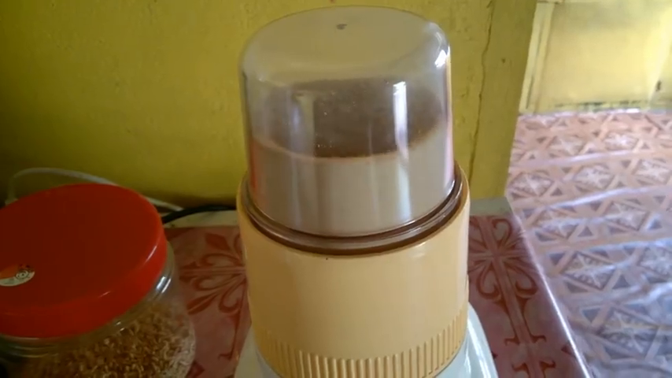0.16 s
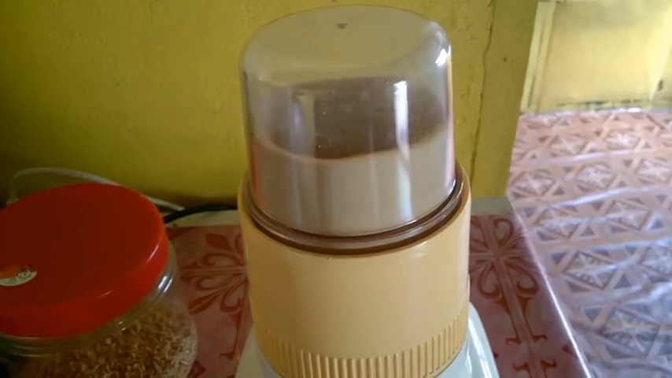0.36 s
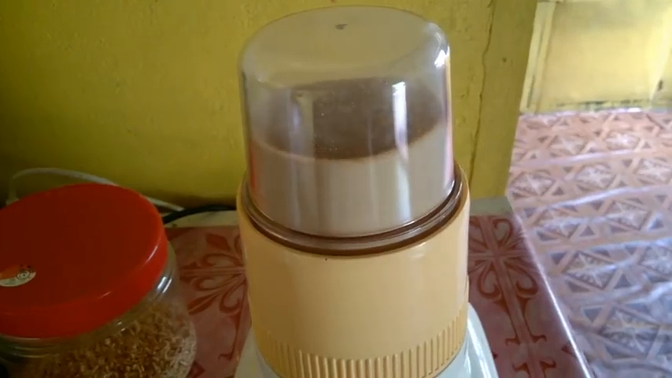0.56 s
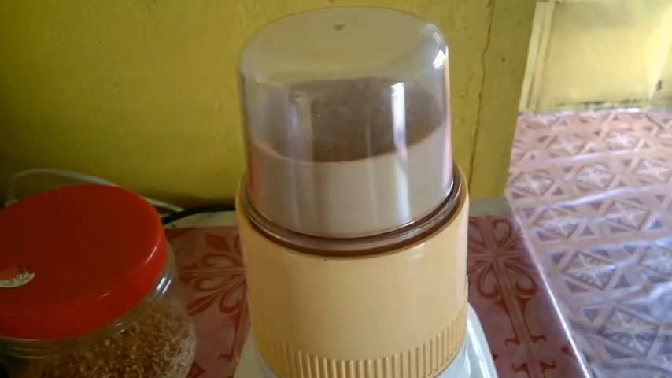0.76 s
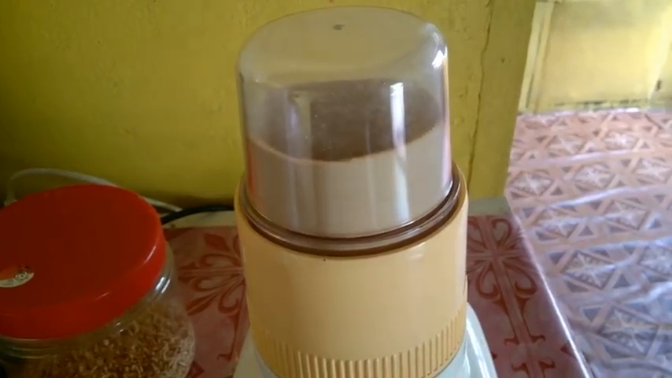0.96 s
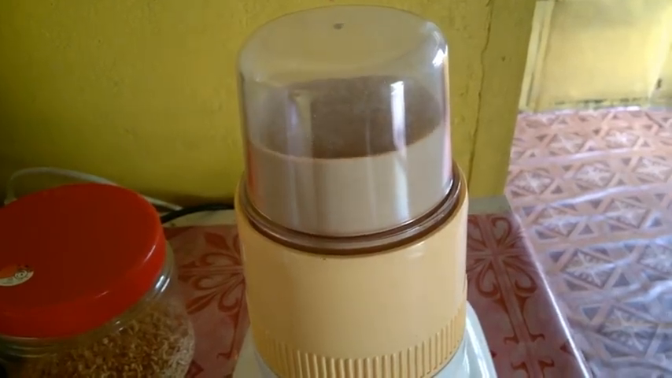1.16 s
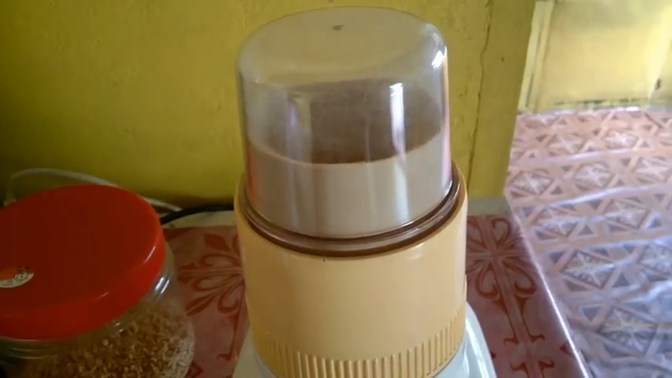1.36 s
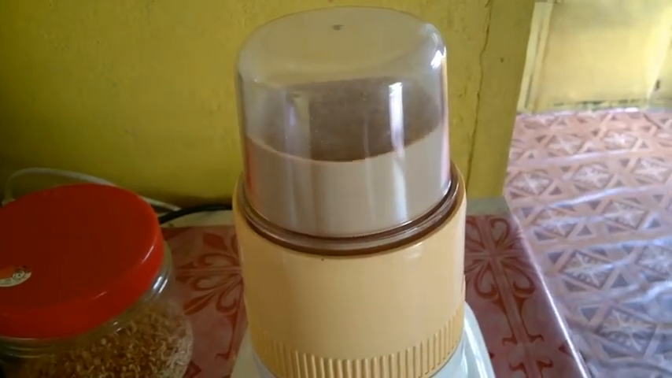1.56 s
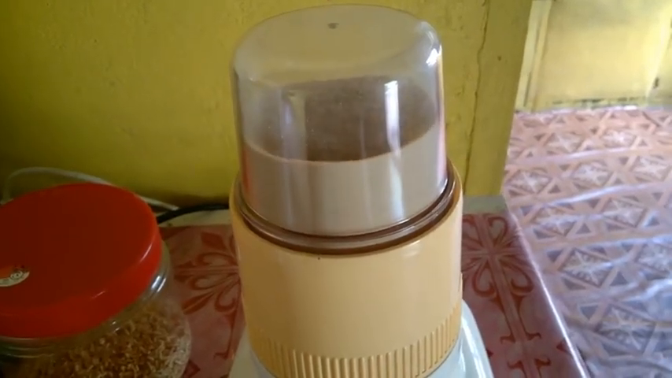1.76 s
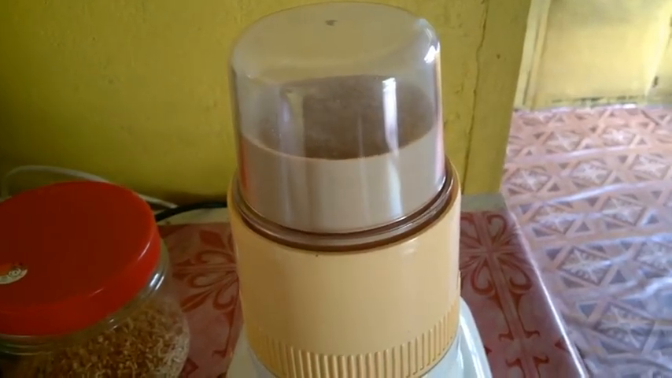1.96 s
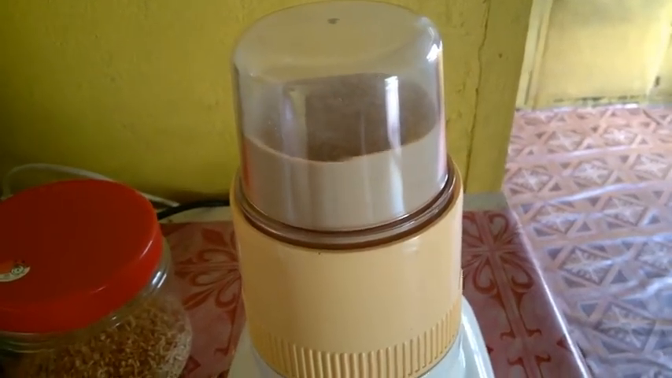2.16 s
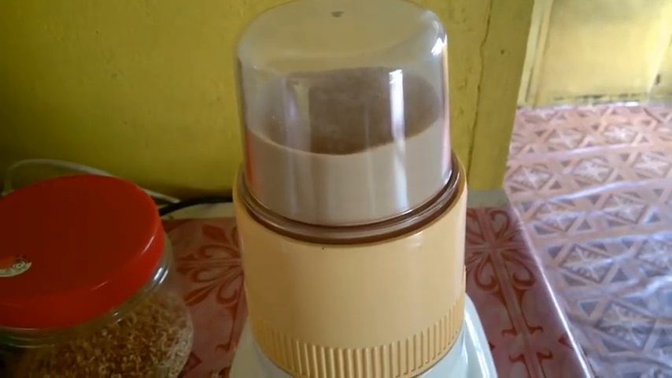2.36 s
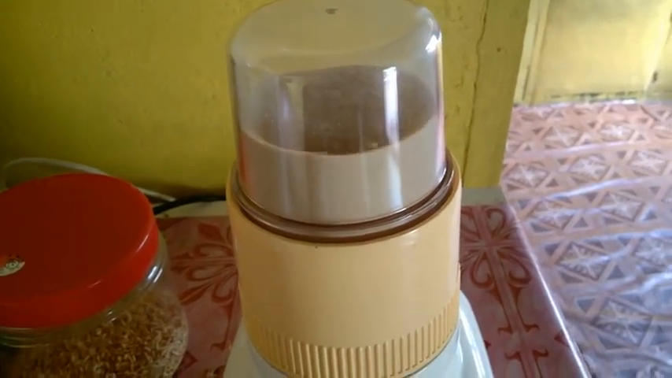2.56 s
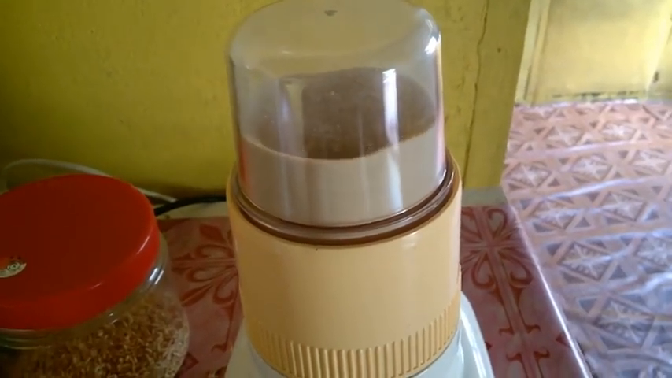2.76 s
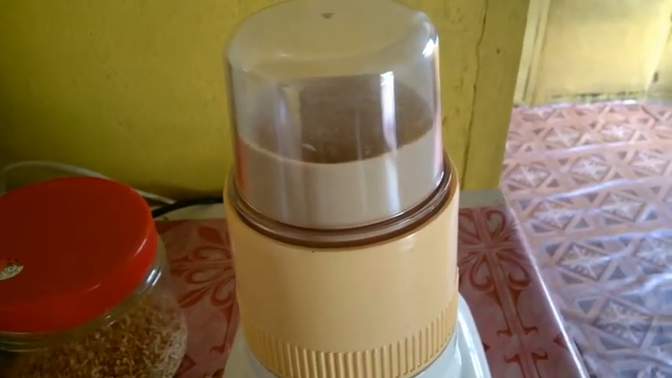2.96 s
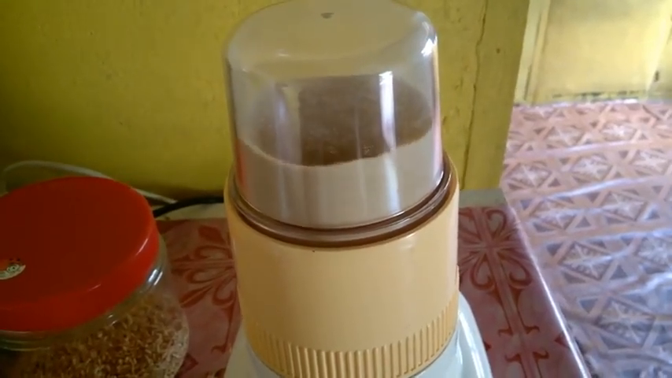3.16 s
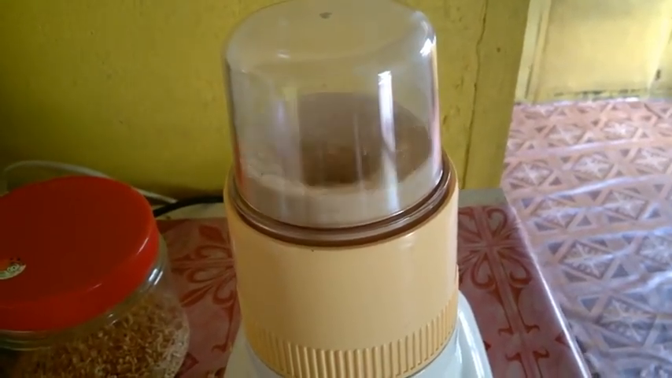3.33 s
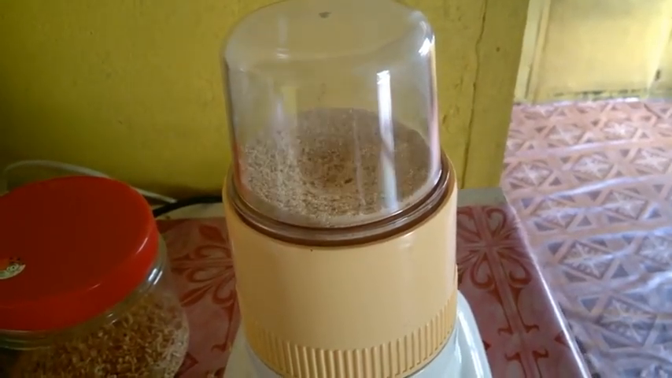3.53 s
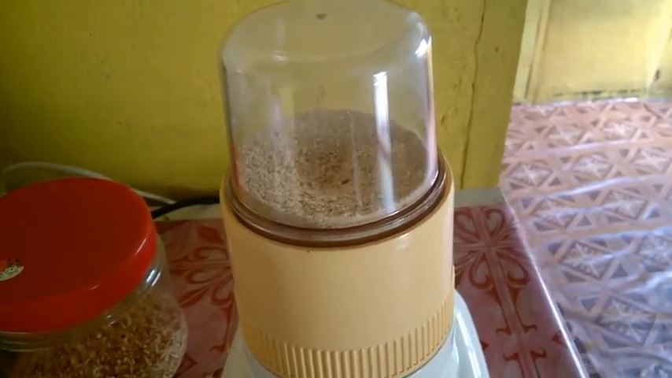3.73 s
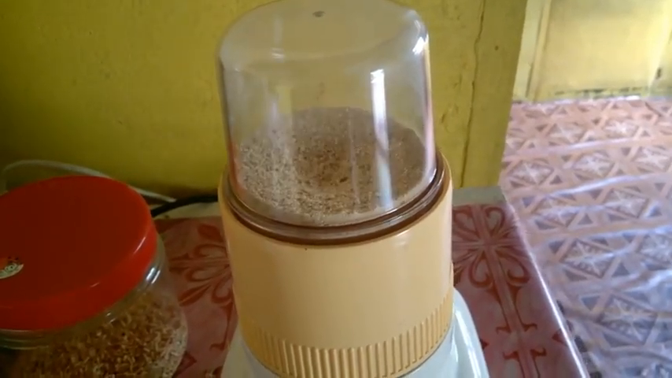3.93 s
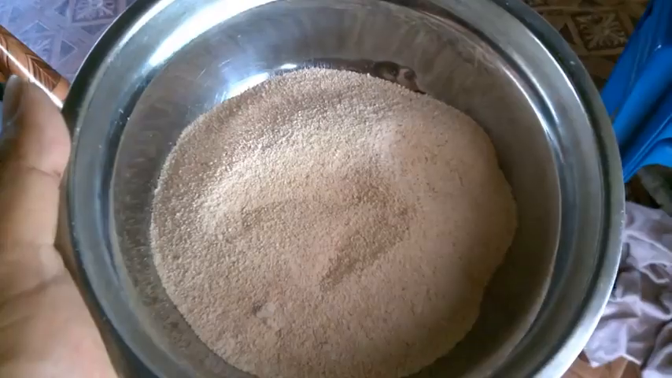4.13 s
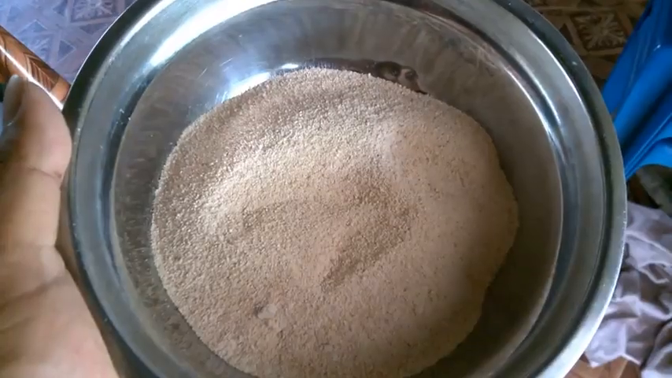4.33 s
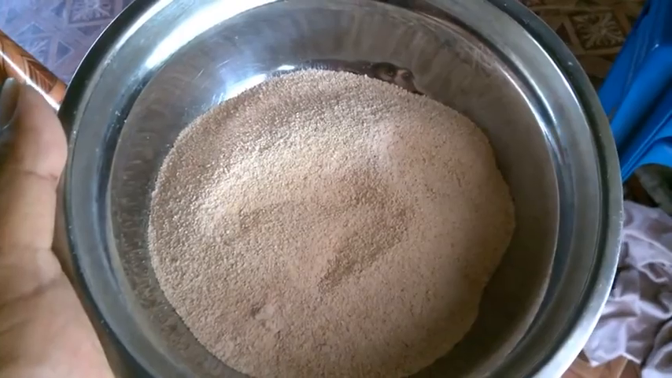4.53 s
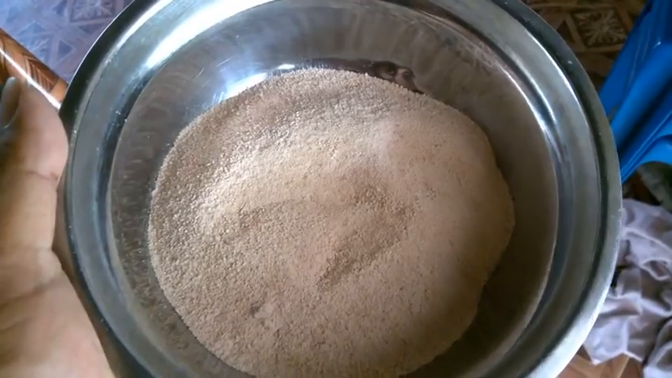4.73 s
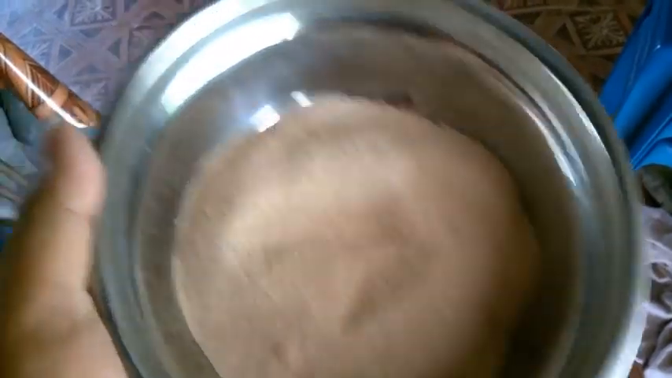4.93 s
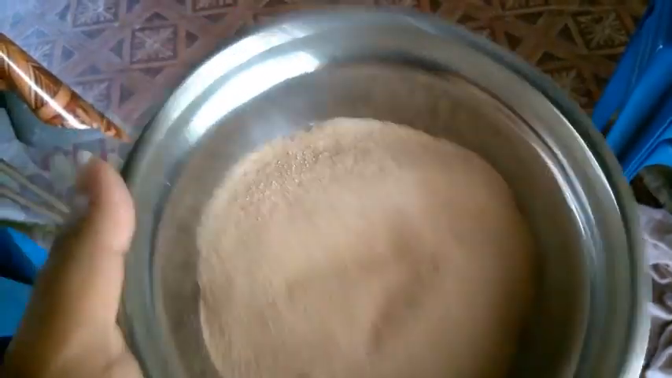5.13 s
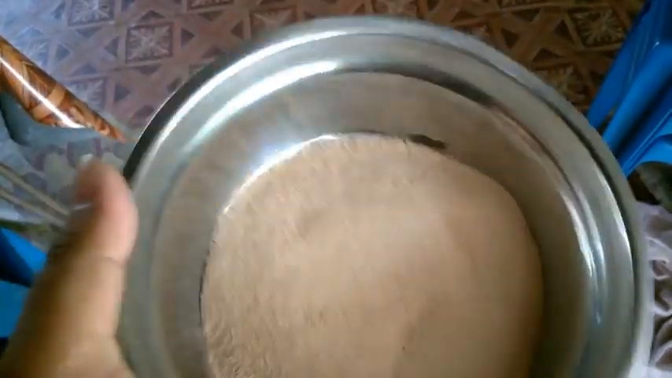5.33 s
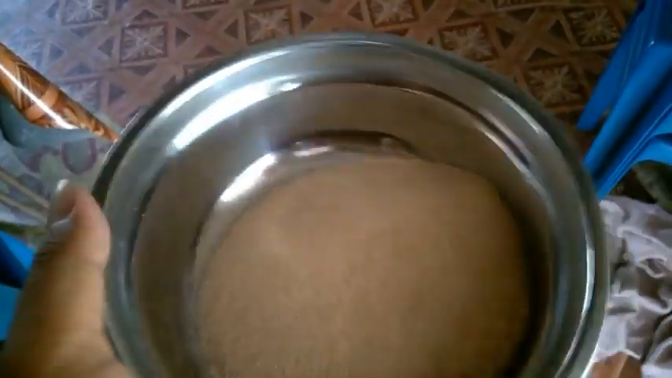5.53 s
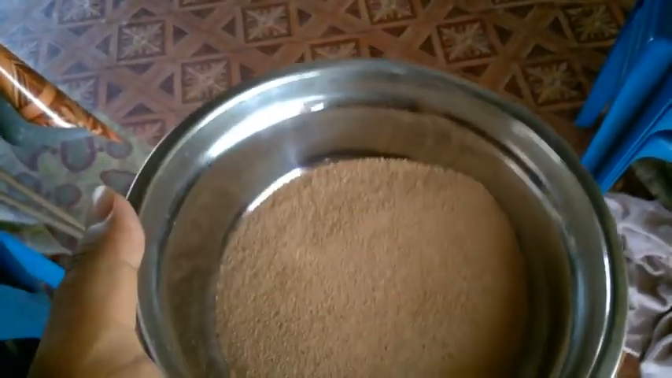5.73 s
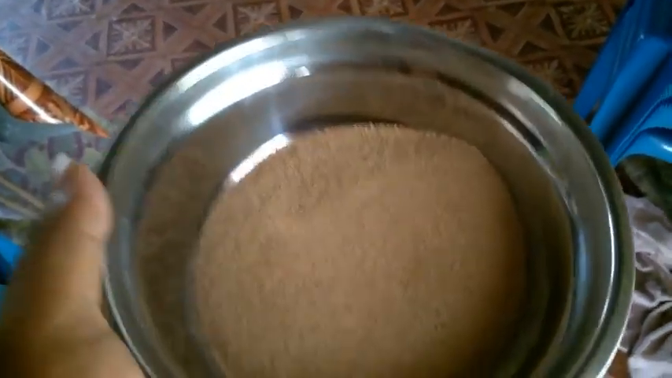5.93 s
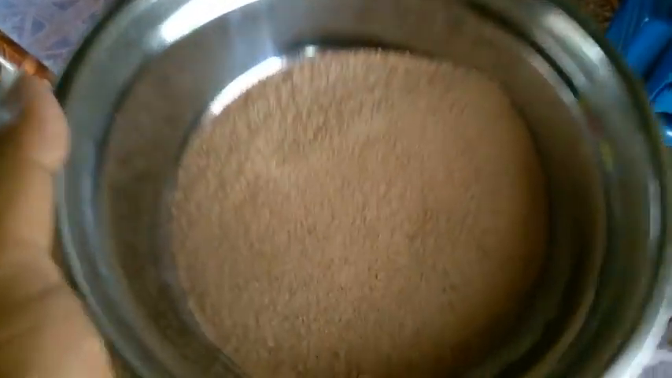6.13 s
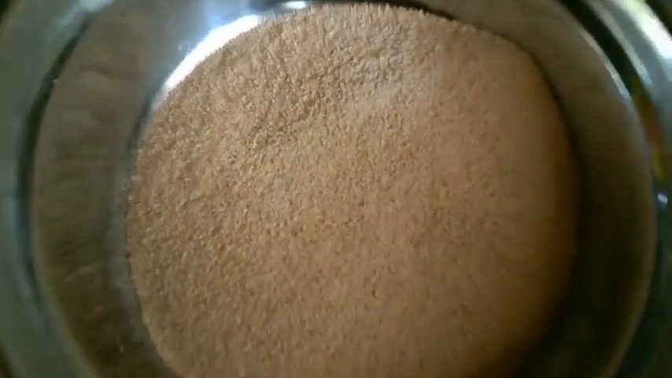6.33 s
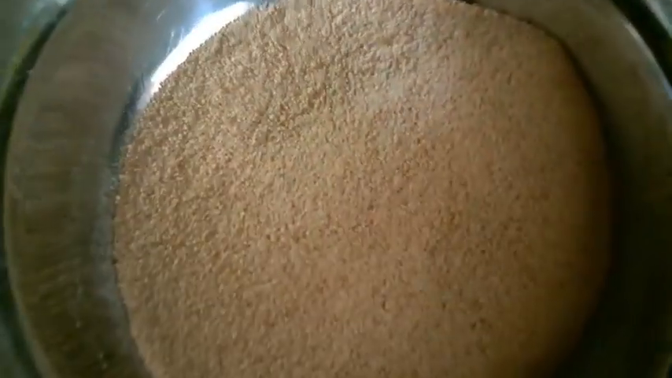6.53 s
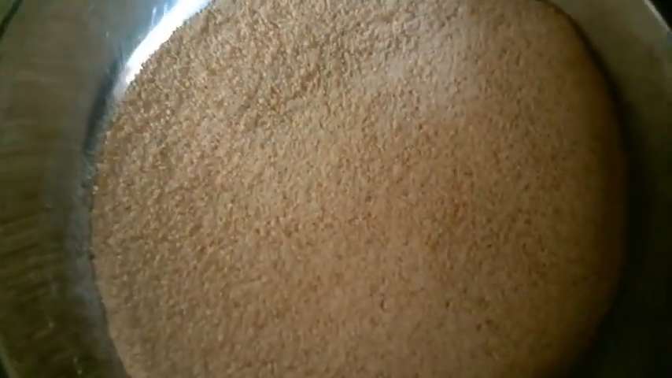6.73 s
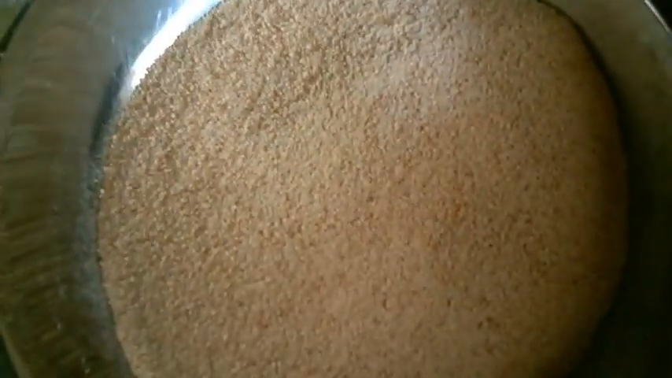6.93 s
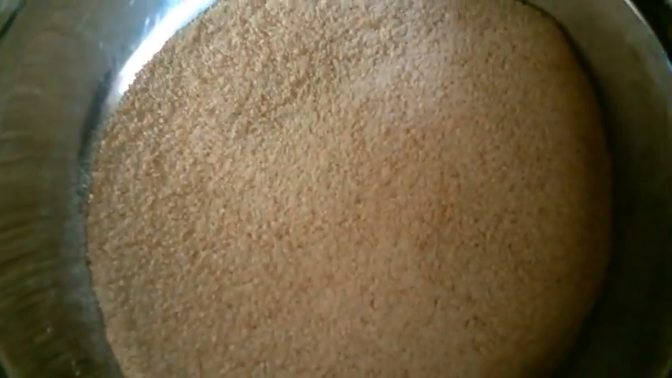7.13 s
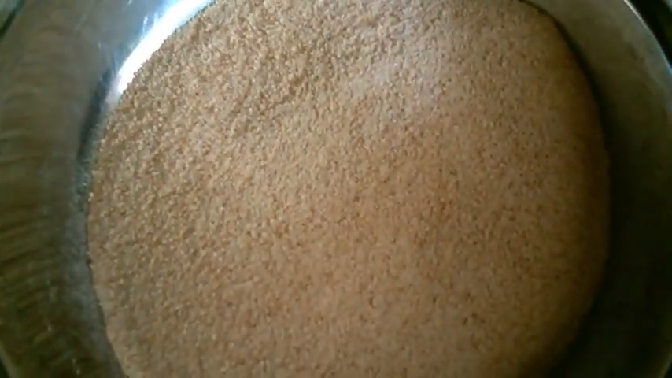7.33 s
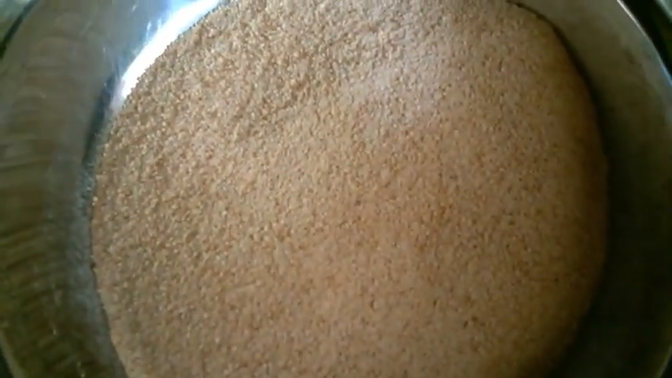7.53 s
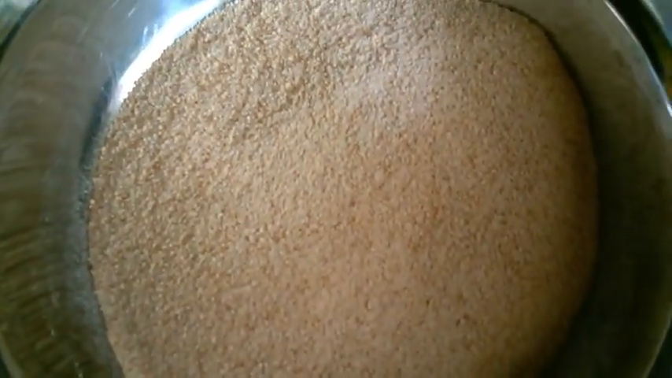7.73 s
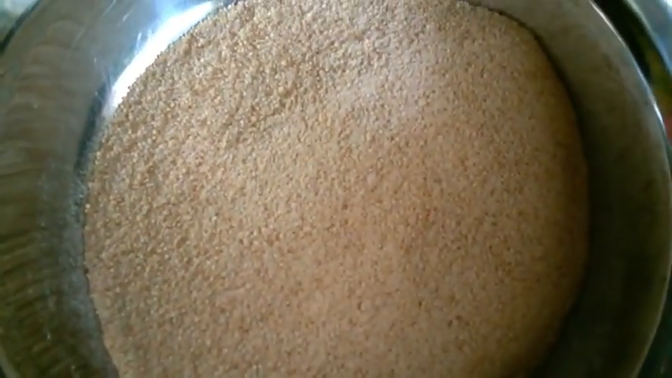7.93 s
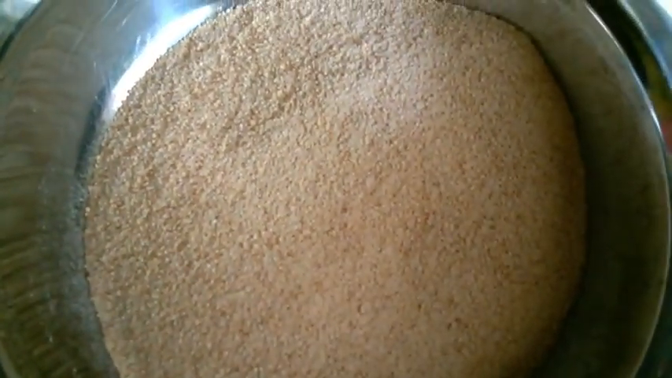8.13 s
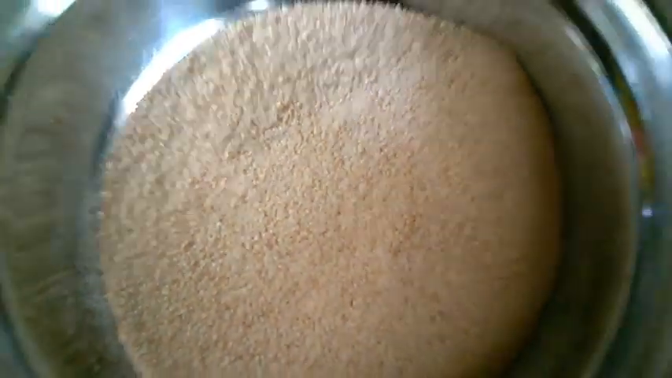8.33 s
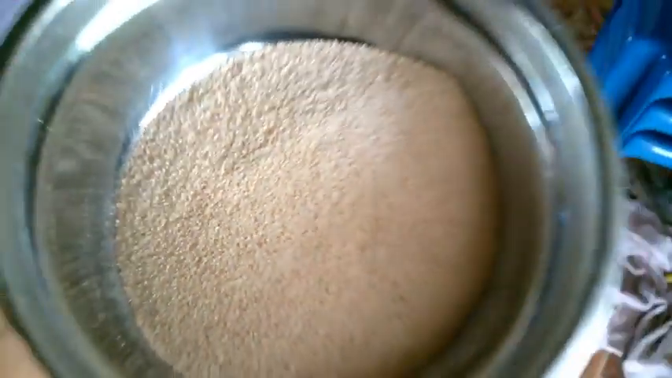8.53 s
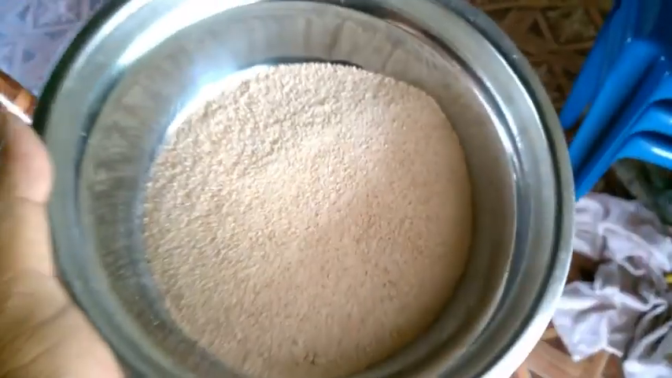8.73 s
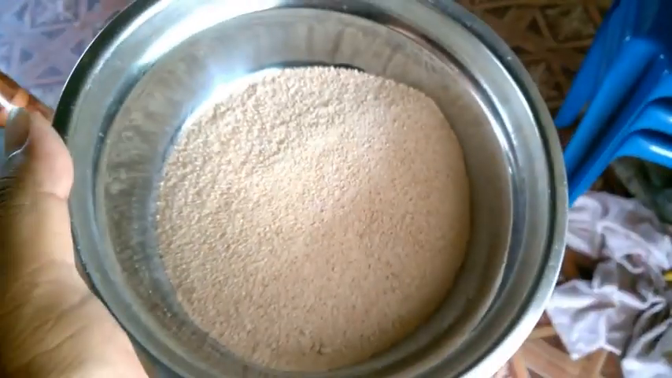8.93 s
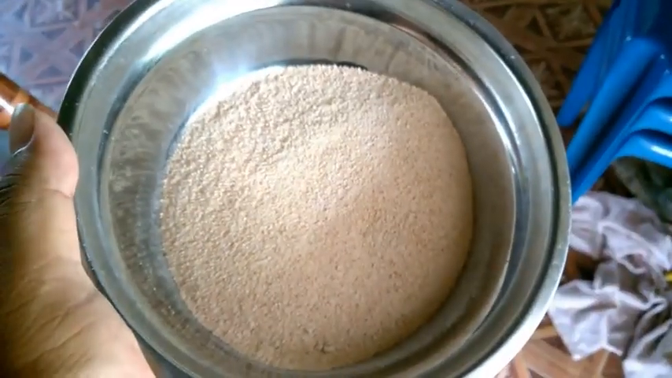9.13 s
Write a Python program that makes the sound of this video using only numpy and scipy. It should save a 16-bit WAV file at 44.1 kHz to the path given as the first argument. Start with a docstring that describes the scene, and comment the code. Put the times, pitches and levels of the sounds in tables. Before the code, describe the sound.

From 0 to 2.4 seconds a small electric grinder runs loudly and close: a steady buzzing motor hum near 245 hertz, rough knocking and a dense bright hiss of grains against a plastic jar, the knocks softening slightly as the hiss grows. At 2.4 it is switched off; pitch slides down smoothly for about a second, grain noise thinning, with a tiny burst at 3.0, stopping near 3.4. A faint shrill cicada and light handling rustles remain. Near silence from 4.15 to 4.26, then a quick fade-in to quiet room air, low wavering drone and a second, nearer cicada. Small gliding, echoing bird chirps come from 4.5 to 5.8, and again from 7.1 to 8.9. Soft, quickening powder swishes occur around 5.1 to 5.6. A dull thud with clatter lands at 6.65, weaker bumps until 7.1. Hum shifts around 7.6; sparse rustles continue, and a faint knock comes at 9.

```python
"""A small electric grinder hums, knocks and hisses first: rotor harmonics excite its housing, and grains
strike a plastic jar. Switched off, it spins down in a kitchen. A shrill whine, probably of cicadas, is a comb
of click-rate harmonics; tones and coloured noise make a low appliance hum and the room air. Soft rustles are
band noise. After a short, nearly silent break come gliding bird chirps, noise swishes of powder in a steel
bowl, a second, nearer cicada and bumps in the house, made of decaying noise."""
import sys
import numpy as np
from scipy import signal
from scipy.fft import rfft, irfft, next_fast_len
from scipy.io import wavfile
from scipy.ndimage import uniform_filter1d, map_coordinates

SR = 44100
rng = np.random.default_rng(int(sys.argv[2]) if len(sys.argv) > 2 else 0)


def to_wav(sig):
    """Store sig (one row per channel, or 1-D mono) as 16-bit WAV at the path in sys.argv[1].

    Samples outside -1..1 are clipped; the rate is SR.
    """
    pcm = np.clip(np.atleast_2d(sig), -1, 1) * 32767
    pcm = np.round(pcm).astype(np.int16)
    wavfile.write(sys.argv[1], SR, pcm.T)  # frames by channels


N = 404705

# All source levels are in dB ahead of the recorder's input gain; spectra give relative dB.
# Harmonics of the rotor's shaking. Each row: multiple of the rotor speed, level in dB at 0 dB housing gain.
ROTOR_HARMONICS = [(1, -21.8), (2, -30.8), (3, -36.5), (4, -44), (5, -45)]
# Mains ripple side tones, 100 Hz above a rotor harmonic. Each row: multiple of the rotor speed, level in dB.
MAINS_SIDE_TONES = [(1, -48), (3, -37)]
# How well the housing radiates. Each row: frequency in Hz, gain in dB.
HOUSING_RADIATION = [(30, -14), (55, -2), (100, -11), (145, -3), (185, -9), (215, -7), (240, 1.5),
                     (255, -4), (290, -5), (345, 1), (400, -4), (450, 4.5), (490, 2), (560, -16),
                     (750, -20), (1200, -5)]
# Broad colour of grains hitting the jar. Each row: frequency in Hz, gain in dB.
JAR_SLOPE = [(40.0, -28.5), (100.0, -19.5), (200.0, -15), (330.0, -8), (700.0, -16), (1000.0, -14),
             (1700.0, -12), (2700.0, -5), (4400.0, -3.5), (5400.0, 1), (6500.0, -11.5), (9500.0, -19),
             (13500.0, -26.5), (15500.0, -33.5)]
# Resonances and hollows of cup and lid. Each row: centre in Hz, half width in Hz, gain in dB.
JAR_RESONANCES = [(145, 14, 3.5), (469, 41, 7.5), (557.6, 16, -14), (642, 36, 4), (836, 23, 6.5),
                  (1181, 190, 11), (1490, 93, 5.5), (2040, 56, 8), (2964, 100, 3), (3600, 100, -9.5),
                  (3925, 70, 12), (4115, 33, 2), (4100, 39, -4), (4700, 64, 7.5), (5270, 24, 2),
                  (5390, 61, 1.5), (5780, 34, 4.5), (7137, 260, 9), (7530, 50, 7.5), (7920, 30, -8),
                  (8030, 150, 8.5), (8892, 270, 5.5), (11050, 640, 6.5), (15020, 550, 7.5)]
# Comb of lines in the cicada song. Each row: multiple of the click rate, relative level in dB.
TYMBAL_LINES = [(16, -39), (17, -26.5), (18, -7), (19, -6.5), (20, 0), (21, -7.5), (22, -12), (23, -22),
                (24, -22), (25, -34.5), (26, -31), (27, -38), (28, -38.5), (34, -44.5)]
# Noisy part of the cicada song. Each row: frequency in Hz, relative level in dB.
RASP_SPECTRUM = [(4500, -52), (5400, -27), (5900, 8), (6700, -5), (7200, -14), (8300, -30), (10700, -39.5),
                 (12000, -55.5)]
# The near cicada, heard only after the break. Each row: time in seconds, level in dB.
NEAR_CICADA_LEVEL = [(4.45, -38.5), (5.72, -36.5), (6.42, -40), (6.47, -37), (7.03, -35), (7.16, -41.5),
                     (7.84, -34), (8.0, -41), (8.12, -35.5), (8.31, -37.5), (8.5, -37)]
# Appliance hum before sound returns from the break. Each row: frequency in Hz, level in dB.
EARLY_HUM = [(70, -56.5), (119, -65.5), (301.5, -63), (903, -78)]
# Appliance hum after the break. Each row: frequency in Hz, level in dB before the swell, level in dB after it.
LATE_HUM = [(134.6, -63, -68), (161, -56.5, -49.5), (737.5, -79, -73.5), (899.0, -77, -75),
            (958.2, -83, -78)]
# Low drone after the break. Each row: time in seconds, level in dB.
DRONE_LEVEL = [(4.45, -43), (5.7, -56.5), (5.87, -42), (6.26, -50), (6.63, -40.5), (7.18, -53), (7.51, -43),
               (9.05, -40.5)]
# Room air before and after the break. Each row: frequency in Hz, relative level in dB.
EARLY_AIR = [(15, -26.5), (40, -7.5), (75, 1.5), (125, -11.5), (170, -20), (260, -25), (420, -27),
             (700, -27), (1100, -36.5), (2000, -34), (3500, -30.5), (5500, -28.5), (9000, -49.5),
             (15000, -62.5)]
LATE_AIR = [(15, -22), (38, -6), (59, -4.5), (92, -11), (150, -7.5), (210, -28.5), (300, -24), (456, -31.5),
            (800, -37.5), (1300, -43), (2100, -48), (3300, -41.5), (5000, -43.5), (15000, -65)]
# Handling scuffs. Each row: centre time in seconds, half length in seconds, centre in Hz,
# half width in octaves, level in dB.
HANDLING_RUSTLES = [(3.85, .03, 1700, 0.38, -59.5), (3.89, 0.041, 2940, 0.28, -55.5),
                    (4.042, 0.037, 2980, .7, -64), (4.604, 0.058, 2460, 0.86, -62.5),
                    (5.352, 0.065, 4150, 0.45, -55), (5.519, .04, 870, 0.16, -58.5),
                    (5.557, .06, 3000, 0.65, -63), (5.805, 0.043, 3180, .8, -59.5),
                    (6.445, 0.04, 2800, 0.77, -58.5), (7.52, 0.076, 4630, 0.58, -56.5),
                    (7.937, .035, 2920, 0.64, -62), (8.14, .04, 4200, .35, -61.5),
                    (8.82, 0.0366, 3600, .55, -57.5)]
# Bird calls. Each row: start in seconds, length in seconds, start in Hz, end in Hz, level in dB.
BIRD_CALLS = [(4.535, .1, 2730, 3370, -62), (4.596, 0.13, 3970, 3730, -52.5),
              (4.869, 0.061, 4480, 4630, -58), (5.274, 0.13, 3720, 4080, -54),
              (5.755, 0.057, 3520, 3400, -60), (7.138, 0.11, 4000, 4000, -55),
              (7.47, 0.065, 5000, 4120, -58), (7.563, 0.141, 3850, 3663, -56.5),
              (8.09, 0.097, 4180, 4700, -61), (8.78, 0.075, 4500, 3870, -63), (8.792, .06, 2880, 2690, -58)]
# Bumps and scuffs. Each row: start in seconds, clatter in dB, thud in dB, rise time constant in seconds,
# 60 dB decay time in seconds.
HOUSE_BUMPS = [(6.645, -29, -28, 0.015, 0.68), (6.819, -49, -32, 0.0059, 0.4),
               (7.0, -56, -56.5, 0.012, 0.94), (7.11, -41.5, -44, 0.055, .65),
               (8.976, -47.5, -71, 0.003, 0.44)]
# Spectra of the two parts of a bump. Each row: frequency in Hz, relative level in dB.
CLATTER_SPECTRUM = [(150, -39), (250, -3), (395, -4), (460, -34), (571, -7.5), (900, -12.5), (1660, -12.5),
                    (2940, -11.5), (5200, -21.5), (6760, -46), (11400, -120)]
THUD_SPECTRUM = [(20, -6), (50, -7), (110, 3.5), (200, -15), (400, -18), (900, -24)]

OFF_S, MAINS_HZ = 2.395, 50  # switch-off time; mains frequency
# Rotor: turns per second at first, those gained by switch-off, and those lost each second when coasting
RUN_HZ, EASE_HZ, BRAKE_HZ_PER_S = 244, 4.7, 238
# The slowing rotor rocks the grinder on its feet: resonance, half width, level
ROCKING_HZ, ROCKING_WIDTH_HZ, ROCKING_DB = 80, 31, -42
# Coarse grains knock less as they turn to powder, fine grains hiss more
KNOCK_DB, KNOCK_FALL_DB_PER_S = -15.5, 2.35
HISS_DB, HISS_RISE_DB_PER_S = -14.1, .45
# Knock and hiss lost per tenfold drop in speed; 60 dB decay time of the last grains
KNOCK_DB_PER_DECADE, HISS_DB_PER_DECADE, SETTLE_S = 14.5, 13, .33
# A clump falls into the slowing blade: centre time, half length, extra hiss
CLUMP_S, CLUMP_LENGTH_S, CLUMP_DB = 3, .015, 2.98
# Tymbal clicks: clicks per second at 0 s, gain in that rate per second
FAR_CLICKS, NEAR_CLICKS = (326, 1.15), (300.9, 1.46)
FAR_CICADA_DB, FAR_CICADA_AFTER_DB = -47, -48.5  # before and after the break
# Appliance drone, and the start and rise time of the hum's swell
DRONE_HZ, SWELL_S, SWELL_RISE_S = 53.5, 7.62, 0.33
AIR_BEFORE_DB, AIR_AFTER_DB, AIR_FALL_DB_PER_S = -51, -42.5, 0.76  # the fall follows the break
# Powder: first swish, first gap between swishes, each gap over the last
SLIDE_S, SLIDE_GAP_S, SLIDE_SHRINK = 5.1, 0.1, .92
# Time and level of the strongest swish, and the fall to either side of it
SLIDE_PEAK_S, SLIDE_DB, SLIDE_FALL_DB_PER_S = 5.33, -59.5, 30
# The break: sound stops, returns, and fades in over
CUT_S, RESUME_S, FADE_IN_S = 4.15, 4.262, 0.12
GAIN_DB, TOP_HZ = -2, 15700  # the recorder's input gain and upper band limit


def amp(db):
    """The decibel law: 20 dB is a tenfold amplitude."""
    return 10 ** (np.asarray(db) / 20)


def unit(x):
    """Normalization of mean power: scale to rms 1."""
    return x / np.sqrt(np.mean(x ** 2) + 1e-20)


def clock():
    """Uniform sampling: the time of each sample in seconds."""
    return np.arange(N) / SR


def level_curve(rows):
    """Linear interpolation of (s, dB) rows: one level per sample."""
    s, db = np.transpose(rows)
    return np.interp(clock(), s, db)


def wobble(rate):
    """Band-limited fluctuation: a smooth curve through random knots, rate of them a second."""
    knots = rng.standard_normal(int(N * rate / SR) + 4)
    coarse = np.linspace(0, N / SR, 8192)
    return np.interp(clock(), coarse, map_coordinates(knots, [coarse * rate]))


def angle_of(hz):
    """Phase is the running integral of a changing frequency."""
    return 2 * np.pi * np.cumsum(hz) / SR


def filtered(x, response):
    """Linear filtering: the spectrum of x times a response that is a function of frequency in Hz."""
    m = next_fast_len(N + SR // 2)
    return irfft(rfft(x, m) * response(np.fft.rfftfreq(m, 1 / SR)), m)[..., :N]


def noise(points):
    """Spectral shaping: random noise through a (Hz, dB) curve on a log frequency axis, at rms 1."""
    f, db = np.transpose(points)

    def colour(hz):
        return amp(np.interp(np.log(hz + 1), np.log(f), db, left=-120, right=-120))
    return unit(filtered(rng.standard_normal(N), colour))


def room(x, t60, wet_db):
    """Diffuse reverberation: hard walls answer with exponentially decaying noise."""
    t = np.arange(SR // 2) / SR
    tail = rng.standard_normal(len(t)) * amp(-60 * t / t60)
    return x + amp(wet_db) * signal.fftconvolve(x, tail / np.linalg.norm(tail))[:N]


def rotor_speed():
    """Rotor dynamics: turns per second creep up as the load gets finer, then friction brakes evenly."""
    t = clock()
    driven = RUN_HZ + EASE_HZ * np.minimum(t / OFF_S, 1) ** 2
    return np.maximum(driven - BRAKE_HZ_PER_S * np.maximum(t - OFF_S, 0), 0)


def torque_ripple():
    """Alternating-current torque: the motor pulls twice per mains cycle until it is switched off."""
    return np.sin(2 * np.pi * 2 * MAINS_HZ * clock()) * (clock() < OFF_S)


def motor(speed, turn, unbalance_power=3.6):
    """Forced vibration: rotor harmonics slide through the housing's resonances as the rotor slows."""
    f, radiated_db = np.transpose(HOUSING_RADIATION)
    pace = speed / speed.max()
    shake = np.zeros(N)
    for order, db in ROTOR_HARMONICS:
        # the whirling load roughens the overtones most
        unrest = min(order - .6, 2) * pace
        housing_db = np.interp(order * speed, f, radiated_db)
        size = amp(db + housing_db + 1.25 * unrest * wobble(25))
        # the unbalance force falls steeply with the speed; the blade's beating lasts longer
        force = pace ** unbalance_power if order == 1 else np.sqrt(np.clip(pace - .03, 0, 1))
        shake += force * size * np.sin(order * turn + .17 * unrest * wobble(30))
    ripple = 2 * np.pi * 2 * MAINS_HZ * clock()
    buzz = np.zeros(N)
    for order, db in MAINS_SIDE_TONES:
        buzz += amp(db + 2.2 * wobble(18)) * np.sin(order * turn + ripple)
    resonance = np.exp(-((speed - ROCKING_HZ) / ROCKING_WIDTH_HZ) ** 2)
    rocking = amp(ROCKING_DB) * resonance * np.sin(turn)
    # sqrt(2) makes the tone levels rms
    return np.sqrt(2) * (shake * (1 + 0.16 * torque_ripple()) + buzz * (clock() < OFF_S) + rocking)


def jar(hz):
    """Modal response: a broad slope with the resonances of cup and lid on it."""
    f, slope_db = np.transpose(JAR_SLOPE)
    modes_db = sum(db * np.exp(-((hz - centre) / width) ** 2) for centre, width, db in JAR_RESONANCES)
    return amp(np.interp(np.log(hz + 1), np.log(f), slope_db, left=-30) + modes_db)


def settled(gain):
    """Exponential relaxation of power: the last grains die away after the blade's drive."""
    keep = amp(-120 / (SETTLE_S * SR))  # power kept per sample
    return np.sqrt(signal.lfilter([1 - keep], [1, -keep], gain ** 2, zi=[keep])[0])


def milling_levels(pace):
    """Impact power laws: coarse grains turn to powder, and knock and hiss fade with the blade's speed."""
    t = clock()
    decades = np.log10(pace + 1e-9)
    clump_db = CLUMP_DB * np.exp(-((t - CLUMP_S) / CLUMP_LENGTH_S) ** 2)
    clump_db += .35 * wobble(12)  # smaller clumps fall all the time
    knock = settled(amp(KNOCK_DB_PER_DECADE * decades)) * amp(KNOCK_DB - KNOCK_FALL_DB_PER_S * t)
    hiss = settled(amp(HISS_DB_PER_DECADE * decades)) * amp(HISS_DB + HISS_RISE_DB_PER_S * t + clump_db)
    return knock, hiss


def below(x, edge_hz):
    """Low-pass filtering: a steep roll-off above the edge, without phase shift."""
    return filtered(x, lambda hz: 1 / (1 + (hz / edge_hz) ** 6))


def grains(speed, turn, split_hz=2900, shine_hz=6800):
    """Random impacts: flung grains excite the jar with thousands of hits, sparser and softer as it slows."""
    pace = speed / speed.max()
    density = 14000 * (.4 + pace) / SR  # chance of a hit per sample
    hits = (rng.random(N) < density) * rng.standard_normal(N) / np.sqrt(density)
    # the heap tumbles unevenly and is struck once per blade pass, twice a turn
    hits *= amp(0.95 * wobble(45) + 0.12 * wobble(7.6))
    hits *= 1 + 0.085 * torque_ripple() + 0.29 * pace * np.sin(2 * turn)
    ring = room(filtered(hits, jar), t60=0.19, wet_db=-7.5)
    knock = below(ring, split_hz)
    hiss = unit(ring - knock)
    # slow hits lose their top
    shine = hiss - below(hiss, shine_hz)
    hiss = hiss - shine * (1 - np.clip(1.5 * pace, .02, 1) ** 0.38)
    knock_gain, hiss_gain = milling_levels(pace)
    return unit(knock) * knock_gain + hiss * hiss_gain


def grinder():
    """Common drive: one rotor phase governs both the hum and the milling."""
    speed = rotor_speed()
    turn = angle_of(speed * (1 + 0.0019 * wobble(7.6)))
    return motor(speed, turn) + grains(speed, turn)


def cicada(clicks, spread, unrest, rasp_db, widening=0.11, fading_db=2.8, flutter_hz=25.5):
    """Periodic clicks form a line comb; the body's pulsing splits each line into a beating cluster."""
    rate, quickening = clicks
    click = angle_of(rate + quickening * clock())
    orders, dbs = np.transpose(TYMBAL_LINES)
    t = np.linspace(0, N / SR, 8192)  # coarse time grid for the slow beating
    side = np.arange(-4, 5)[:, None]  # side lines, flutter_hz apart

    def drift():
        return np.array([map_coordinates(rng.standard_normal(64), [3 * t]) for _ in side])

    song = np.zeros(N)
    for k in range(16, 35):
        width = spread * (1 + widening * min(abs(k - 20), 3))
        # reflections give every side line its own slowly shifting strength and phase
        phase = rng.uniform(0, 2 * np.pi, side.shape) + drift()
        path = np.exp(unrest * drift() + 1j * phase)
        side_lines = np.exp(-(side / width) ** 2 / 2 + 2j * np.pi * side * flutter_hz * t)
        cluster = (path * side_lines).sum(0)
        # each line keeps a steady mean strength while it beats, and fades in and out slowly on its own
        cluster /= np.sqrt(np.abs(uniform_filter1d(np.abs(cluster) ** 2, size=500)))
        cluster *= amp(fading_db * drift()[0])
        line = np.interp(clock(), t, cluster) * np.exp(1j * k * click)
        song += amp(np.interp(k, orders, dbs)) * line.real
    return unit(song) + amp(rasp_db) * noise(RASP_SPECTRUM)


def cicadas():
    """Superposition: a far cicada sings throughout; a nearer, slightly lower one joins after the break."""
    resumed = clock() > RESUME_S
    far_gain = amp(np.where(resumed, FAR_CICADA_AFTER_DB, FAR_CICADA_DB))
    near_gain = resumed * amp(level_curve(NEAR_CICADA_LEVEL))
    far = far_gain * cicada(FAR_CLICKS, spread=1.3, unrest=.5, rasp_db=-6)
    near = near_gain * cicada(NEAR_CLICKS, spread=1.45, unrest=0.65, rasp_db=-20)
    return far + near


def hum_tone(hz, db):
    """Narrow-band sound: a sine whose level and phase waver slowly."""
    phase = 2 * np.pi * hz * clock() + .35 * wobble(4.7)
    return np.sqrt(2) * amp(db + .9 * wobble(2.5)) * np.sin(phase)


def kitchen():
    """Steady background: appliance tones over coloured noise of the room air, both altered by the break."""
    t = clock()
    before = sum(hum_tone(hz, db) for hz, db in EARLY_HUM) + amp(AIR_BEFORE_DB) * noise(EARLY_AIR)
    swell = np.clip((t - SWELL_S) / SWELL_RISE_S, 0, 1)
    hum = hum_tone(DRONE_HZ, level_curve(DRONE_LEVEL))
    hum += sum(hum_tone(hz, db + swell * (later_db - db)) for hz, db, later_db in LATE_HUM)
    air = amp(AIR_AFTER_DB - AIR_FALL_DB_PER_S * (t - RESUME_S)) * noise(LATE_AIR)
    return np.where(t < RESUME_S, before, hum + air)


def rustles():
    """Friction noise: each rustle is a short grainy swell in its own band."""
    total, t = np.zeros(N + SR), np.arange(SR // 2) / SR
    hz = np.fft.rfftfreq(len(t), 1 / SR) + 1
    middle = t.mean()
    for s, length, centre_hz, octaves, db in HANDLING_RUSTLES:
        band_gain = np.exp(-(np.log2(hz / centre_hz) / octaves) ** 2 / 2)
        band = unit(irfft(rfft(rng.standard_normal(len(t))) * band_gain))
        swell = np.exp(-((t - middle) / length) ** 2 / 2)
        total[round((s - middle) * SR):][:len(t)] += amp(db) * band * swell
    return total[:N] * amp(1.9 * wobble(90))


def birds():
    """Frequency glides: short chirps, hoarse by random amplitude modulation and smeared by the walls."""
    calls = np.zeros(N)
    for s, length, start_hz, end_hz, db in BIRD_CALLS:
        progress = np.clip((clock() - s) / length, 0, 1)
        pitch = start_hz + (end_hz - start_hz) * progress
        calls += amp(db) * np.sin(np.pi * progress) * np.sin(angle_of(pitch))
    return room(calls * (.5 + 0.73 * wobble(450)), t60=0.61, wet_db=2.0)


def powder(count=8):
    """Modulated sliding noise: soft high swishes of a shaken bowl quicken, swell and ebb."""
    gaps = SLIDE_GAP_S * SLIDE_SHRINK ** np.arange(count - 1)
    times = SLIDE_S + np.cumsum(np.r_[0, gaps])
    levels_db = SLIDE_DB - SLIDE_FALL_DB_PER_S * np.abs(times - SLIDE_PEAK_S)
    swell = sum(amp(db) * np.exp(-((clock() - s) / 0.026) ** 2) for s, db in zip(times, levels_db))
    return swell * noise([(5000, -7.5), (9000, 5), (12000, 2), (14000, -12.5), (15500, -20)])


def bumps():
    """Damped impact: dull blows elsewhere in the house, a thud and a clatter decaying exponentially."""
    clatter, thud = np.zeros(N), np.zeros(N)
    for s, clatter_db, thud_db, rise, t60 in HOUSE_BUMPS:
        t = np.maximum(clock() - s, 0)
        shape = (1 - np.exp(-t / rise)) * amp(-60 * t / t60)
        clatter += amp(clatter_db) * shape
        thud += amp(thud_db) * shape
    edge = amp(-16.5) * noise([(4000, -20.5), (5200, 10), (8000, -2), (12000, -10), (15500, -28)])
    rough_clatter = clatter * amp(0.81 * wobble(70)) * (noise(CLATTER_SPECTRUM) + edge)
    return rough_clatter + thud * noise(THUD_SPECTRUM)


def scene():
    """Superposition of pressures: everything reaches one microphone, sent to two equal channels."""
    mono = grinder() + cicadas() + kitchen() + rustles() + birds() + powder() + bumps()
    return np.array([mono, mono])


def record(dry, tick_db=-48, fade_out_s=.012, silence_db=-50):
    """Saturation and band limiting: peaks round off, sound breaks off, ticks and fades in; the top is cut."""
    rounded = dry / (1 + np.abs(dry / .78) ** 6) ** (1 / 6)
    since = np.maximum(clock() - RESUME_S, 0)
    fade_out = np.clip((CUT_S - clock()) / fade_out_s, 0, 1)
    fade_in = 1 - np.exp(-(since / FADE_IN_S) ** 2)
    fader = np.maximum(fade_out + fade_in, amp(silence_db))
    tick = amp(tick_db) * (since > 0) * np.exp(-since / 0.008)
    return filtered(rounded * amp(GAIN_DB) * fader + tick, lambda hz: hz < TOP_HZ)


dry = scene()
out = record(dry)
to_wav(out)
```